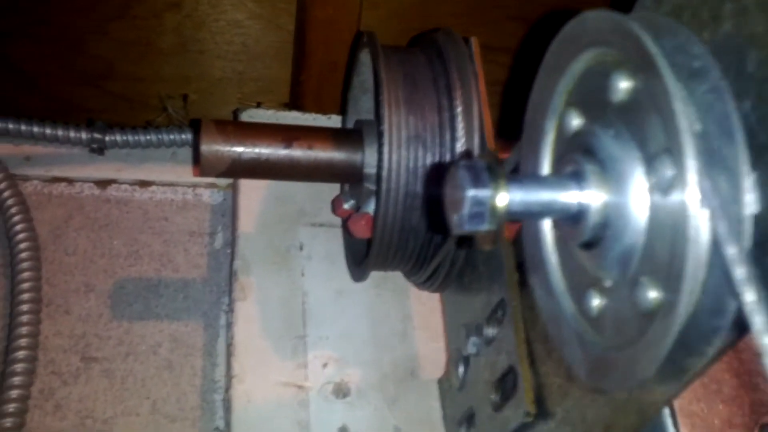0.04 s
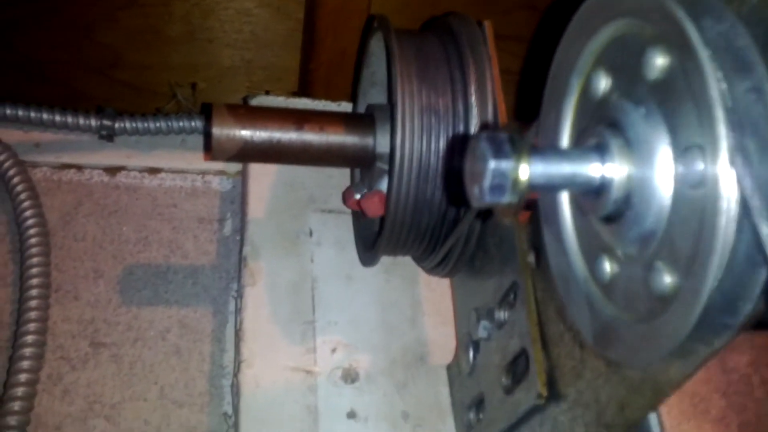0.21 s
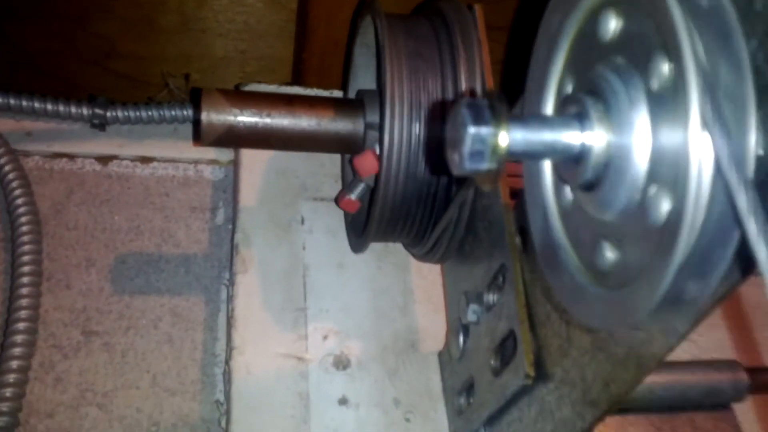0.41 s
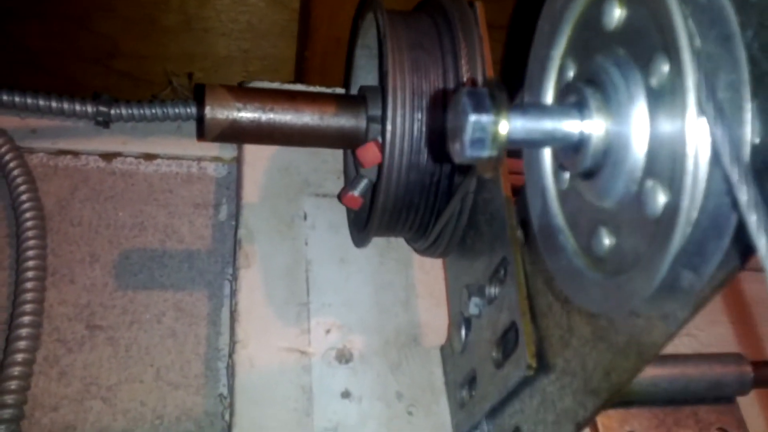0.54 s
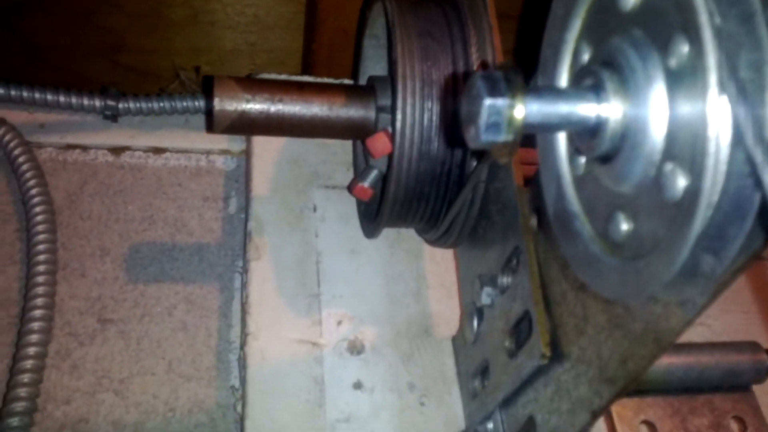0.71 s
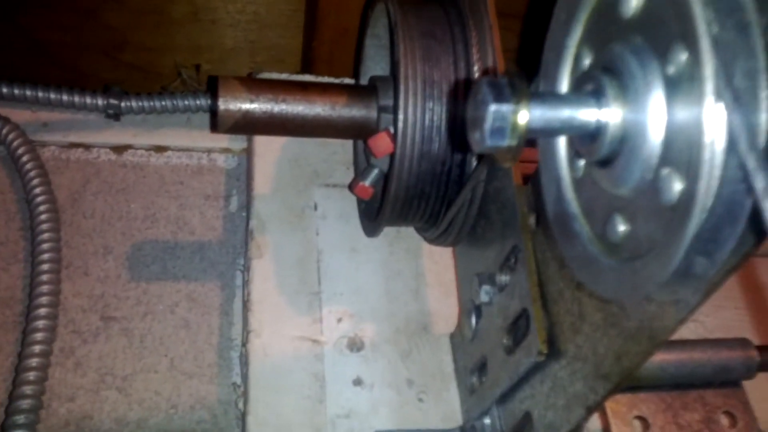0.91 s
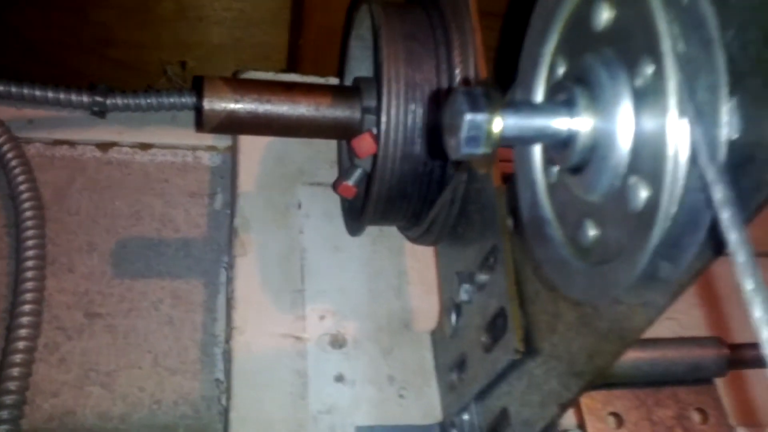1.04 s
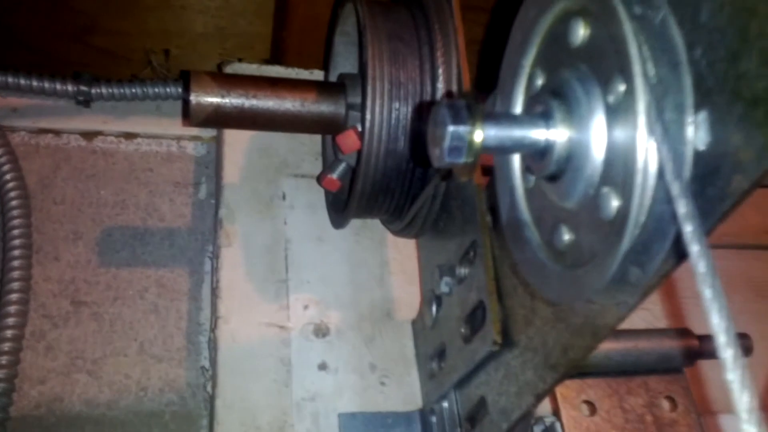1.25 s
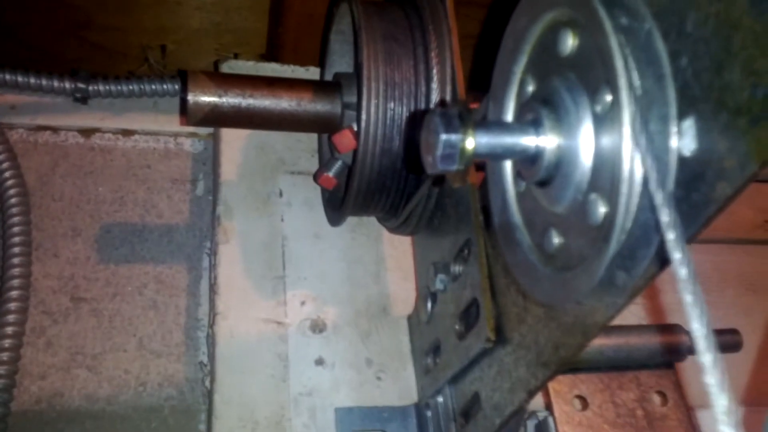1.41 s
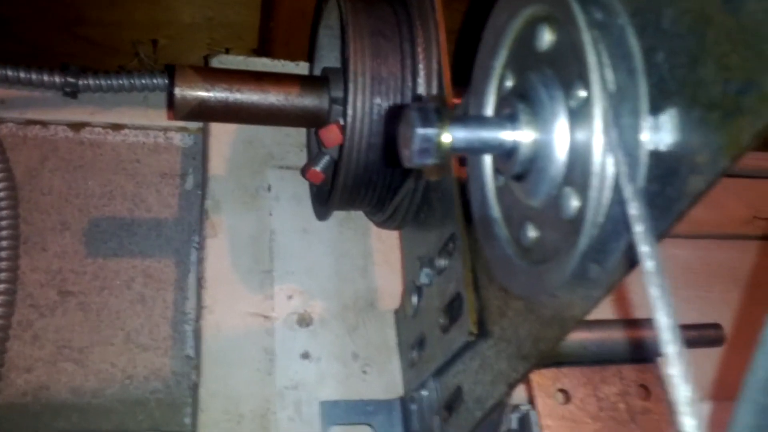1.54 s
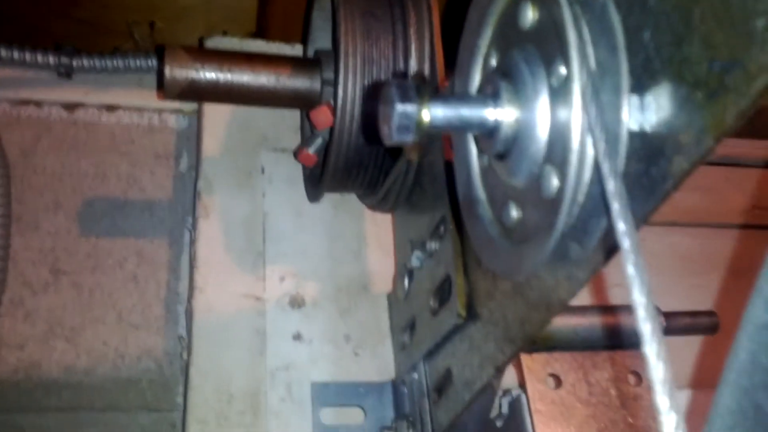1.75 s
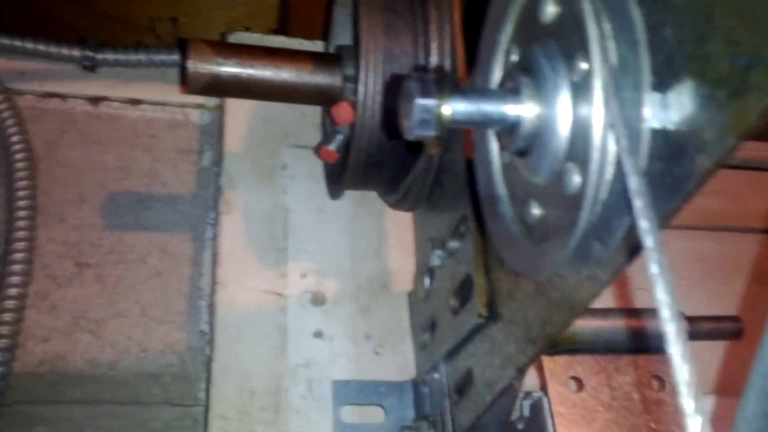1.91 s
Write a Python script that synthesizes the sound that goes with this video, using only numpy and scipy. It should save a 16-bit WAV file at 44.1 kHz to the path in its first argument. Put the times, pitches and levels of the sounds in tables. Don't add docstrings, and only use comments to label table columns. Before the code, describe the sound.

A steel garage door comes to rest: roller clatter fades from the start, with a dry tick at 0.14 s. A jolt and piercing pulley squeal hit at 0.25, the cable snaps at 0.44, and a bright, slightly clipped scraping slam follows at 0.51. Settling clacks at 0.65-0.68 ring away. Quiet garage air remains, with faint knocks near 1.15 and 1.49 and soft rubs around 1.22 and 1.52.

```python
import sys
import numpy as np
from scipy import signal
from scipy.io import wavfile
from scipy.ndimage import uniform_filter1d

SR = 44100
rng = np.random.default_rng(int(sys.argv[2]) if len(sys.argv) > 2 else 0)


def nominal_scale(level):
    x = np.asarray(level, float) / 20
    return 10 ** x


def dump_mix(stems):
    frames = np.atleast_2d(stems).T
    limited = np.clip(frames, -1, 1)
    pcm = np.round(limited * 32767).astype(np.int16)
    wavfile.write(sys.argv[1], SR, pcm)


N = 88200
T = np.arange(N) / SR

# f/Hz, density/dB
AIR_COLOUR = [(12, -37.5), (20, -7), (65, -6), (90, -14), (124, -10.5), (361, -26), (445, -31), (1780, -35),
              (3000, -45), (3900, -64), (6600, -120)]
# f/Hz, density/dB
HISS_COLOUR = [(2500, -10.5), (5000, -8.5), (8500, -9), (10000, -4.5), (11500, -1), (13000, -7.5),
               (15800, -14)]
AIR_DB, HISS_DB = -47.5, -57.5
# f/Hz, density/dB
ROLL_COLOUR = [(200, -12.5), (400, -26), (640, -0.5), (1400, -3), (2200, -16), (4000, -24.5), (5000, -17.5),
               (7500, -36.5)]
ROLL_DB, ROLL_DECAY_SCALE = -20, 1.9
ROLL_HISS_DB, ROLL_HISS_T60_S = -43.5, 1
# f/Hz, t60/s
RING_T60 = [(250, .9), (660, 0.59), (1740, 0.44), (4590, .36), (11000, .25), (15000, .12)]

# t/s, level/dB, rise/s, t60/s
THUDS = [
    (-.05, -27.5, .01, 1.5),
    (.255, -16.5, 0.0067, 1.8),
    (.45, -16.5, 0.018, 0.99),
    (.52, -16, .015, 1.1),
    (.65, -28, 0.017, 1.36),
]
# f/Hz, density/dB
THUD_COLOUR = [(12, -35.5), (20, 0), (108, -0.5), (214, -8), (255, -3.5), (304, -13.5), (425, -9),
               (500, -18), (650, -16), (1100, -120)]

# t/s, peak level/dB, ring t60/s, wash/dB, dullness/0-1
TICKS = [
    (0.1417, -8.5, 0.03, -14, 0.3),
    (0.44, -4.5, 0.03, -12.5, 0.3),
    (0.6498, -11, 0.03, -16.5, 0.3),
    (0.6727, -22.5, 0.03, -10.5, 0.3),
]
# f/Hz, density/dB
TICK_COLOUR = [(600, -21.5), (1200, -14), (2000, -21), (4500, -15.5), (6000, -4.5), (9000, -6.5),
               (11000, -1), (15800, -16.5)]
# t/s, level/dB, f/Hz, t60/s
TICK_RINGS = [(.1416, -32, 3500, .05), (.1425, -26, 6000, .02), (.4405, -23, 5200, .12),
              (.6728, -15, 3600, .018), (.6505, -24, 4500, .04), (.652, -18, 1400, .05),
              (.681, -17, 1400, .05), (.68, -25, 930, .3), (.68, -30, 600, .35), (.26, -24, 255, .2)]
ECHO_S, ECHO_DB, DULL_DB_PER_OCT = 0.0012, -4.5, -5
CRACK_DB, CRACK_HZ, CRACK_S = -3, 9000, 0.0002
LINGER_DB, LINGER_T60_S = -30, 0.58

# t/s, level/dB, rise/s, decay scale/1, brightness/0-1
BLOWS = [
    (0.241, -16, 0.0059, 1.45, 0.47),
    (.441, -14.5, .004, 1.2, 0.2),
    (.513, -10.5, 0.0023, 1.2, .01),
    (0.648, -18.5, 0.0028, .9, 0.48),
    (0.673, -21.5, 0.0024, .9, 0.1),
]
# f/Hz, density/dB
PANEL_COLOUR = [(150, -41), (250, -12), (469, -18), (606, -2.5), (793, -10), (935, -1.5), (1040, -6.5),
                (1260, -3.5), (9000, -40), (11700, -70.5), (19800, -120)]
BRIGHT_DB_PER_OCT = 6.0
SETTLE_S, SETTLE_DB_PER_S = 0.7, -26.5

# f/Hz, level/dB, t60/s
PULLEY_MODES = [(8030, -11, .25), (8320, -7, .3), (8393, 0, .42), (8463, -1, .42), (8540, -8, .3),
                (8890, -11, .2), (9023, -14, .25)]
# f/Hz, density/dB
SQUEAL_COLOUR = [(2500, -34), (5500, -33.5), (7500, -22), (8400, -6), (9200, -13), (10300, -16.5),
                 (12000, -30), (15800, -27)]
# f/Hz, t60/s
SQUEAL_T60 = [(3000, .35), (7300, .25), (8400, .42), (9500, .29), (11000, .3), (15000, .24)]
SQUEAL_S, SQUEAL_RISE_S, SQUEAL_DB, SQUEAL_WASH_DB = 0.2445, 0.008, -7, -1
SQUEAL_STOP_S, SQUEAL_STOP_DB_PER_S = 0.33, -200

# t/s, level/dB, rise/s, decay scale/1
SCRAPES = [
    (0.453, -15, .012, 1.2),
    (0.491, -10, .01, 1.33),
    (0.5112, 1, .004, 1.063),
]
# f/Hz, density/dB
SCRAPE_COLOUR = [(1500, -15.5), (3700, -18), (8000, -21), (9800, -15.5), (11000, -4.5), (12200, -14.5),
                 (13400, -17), (15800, -29.5)]
# f/Hz, t60/s
SCRAPE_T60 = [(2000, 0.33), (5000, .4), (8000, 0.25), (11000, 0.25), (13500, .25), (15500, .13)]
# f/Hz, level/dB, t60/s
TRACK_MODES = [(3500, -4, .4), (3700, 0, .45), (260, 2, .25)]
TRACK_DB = -23

# t/s, level/dB, f/Hz, t60/s
KNOCKS = [
    (1.128, -52, 620, .1),
    (1.172, -48, 570, .3),
    (1.4915, -34, 280, .035),
]
# middle t/s, rise/s, level/dB, fade/s, tilt/dB per octave
RUBS = [
    (1.223, 0.063, -39.5, .09, -1),
    (1.52, .03, -43.5, 0.18, 1.2),
]
# f/Hz, density/dB
RUB_COLOUR = [(180, -43), (300, -15), (485, -15), (563, -26), (710, -13.5), (1150, -18), (5640, -22),
              (11900, -13.5), (15800, -38.5)]


def read(points, hz):
    f, value = np.transpose(points)
    return np.interp(np.log(hz + 1), np.log(f + 1), value)


def decay(u_s, t60_s):
    return nominal_scale(np.maximum(-60 * u_s / t60_s, -200))


def onset(start_s, rise_s):
    return np.clip((T - start_s) / max(rise_s, 1e-4), 0, 1) ** 0.82


def settle():
    return nominal_scale(SETTLE_DB_PER_S * np.maximum(T - SETTLE_S, 0))


def ringing(colour, start_s=0.0, t60=((1, 1e6),), scale=1, tilt_db=0, size=256, patchy_db=0):
    hz, hop = np.fft.rfftfreq(size, 1 / SR), size // 4
    t = np.arange(N // hop + 5) * hop / SR - start_s
    a, b, patch = rng.standard_normal((len(t), len(hz), 3)).T
    patch = uniform_filter1d(patch, size=4, axis=0)
    patch = uniform_filter1d(patch, size=6, axis=1) * np.sqrt(24)
    shape = nominal_scale(read(colour, hz) + tilt_db * np.log2(hz / 4000 + 0.1))
    shape = shape * (hz < colour[-1][0] * 1.02)
    fall_db = -60 * np.maximum(t, 0) / (scale * read(t60, hz))[:, None]
    fall = nominal_scale(np.maximum(fall_db, -200) + patchy_db * patch)
    z = (a + 1j * b) * shape[:, None] * fall / np.sqrt(np.mean(shape ** 2))
    return signal.istft(z, nperseg=size, noverlap=size - hop)[1][:N] / np.sqrt(size * 4 / 3)


def modes(table, start_s, rise_s, blur=0.0, sharp=1.0):
    u, out = np.maximum(T - start_s, 0), 0
    for hz, db, t60_s in table:
        width = max(int(sharp * 160 / hz * SR / 16), 1)
        slow = uniform_filter1d(rng.standard_normal((2, N // 16 + 2)), width)
        a, b = uniform_filter1d(slow, width) * np.sqrt(width * 0.75)
        wander = np.interp(np.arange(N) / 16, np.arange(len(a)), a + 1j * b)
        sway = np.sqrt(1 - np.clip(blur, 0, 1) ** 2) + blur * wander
        tone = np.exp(2j * np.pi * (hz * u + rng.random()))
        out = out + nominal_scale(np.maximum(db - 60 * u / t60_s, -200)) * (sway * tone).real
    return onset(start_s, rise_s) * out


def air():
    low = nominal_scale(AIR_DB) * ringing(AIR_COLOUR, size=2048, patchy_db=2.75)
    return low + nominal_scale(HISS_DB) * ringing(HISS_COLOUR, patchy_db=1.9)


def roll():
    clatter = ringing(ROLL_COLOUR, 0, RING_T60, ROLL_DECAY_SCALE, size=512, patchy_db=2.5)
    hiss = ringing(HISS_COLOUR, 0, ((1, ROLL_HISS_T60_S),))
    return nominal_scale(ROLL_DB) * clatter + nominal_scale(ROLL_HISS_DB) * hiss


def thuds():
    out = np.zeros(N)
    for s, db, rise_s, t60_s in THUDS:
        band_t60 = ((60, t60_s * 1.21), (300, t60_s * 0.71))
        out += nominal_scale(db) * onset(s, rise_s) * ringing(THUD_COLOUR, s, band_t60, size=2048)
    return out


def ticks():
    out, linger = np.zeros(N), ringing(HISS_COLOUR)
    for s, db, t60_s, wash_db, dull in TICKS:
        u, echo_u = np.maximum(T - s, 0), np.maximum(T - s - ECHO_S, 0)
        echo = (echo_u > 0) * nominal_scale(np.maximum(ECHO_DB - 60 * echo_u / t60_s, -200))
        env = decay(u * 4.2, t60_s) + echo
        tilt_db = DULL_DB_PER_OCT * dull
        burst = env * ringing(TICK_COLOUR, tilt_db=tilt_db)
        wash = nominal_scale(wash_db) * ringing(TICK_COLOUR, s, RING_T60, 0.4, tilt_db)
        crack = nominal_scale(CRACK_DB) * np.exp(-u / CRACK_S) * np.sin(2 * np.pi * CRACK_HZ * (1 - dull) * u)
        tail = (u > 0) * nominal_scale(LINGER_DB - 60 * u / LINGER_T60_S) * linger
        out += nominal_scale(db) * (onset(s, 0.0003) * (burst + wash) + crack + tail)
    for s, db, hz, t60_s in TICK_RINGS:
        out += nominal_scale(db) * modes([(hz, 0, t60_s)], s, 0.001, blur=0.85, sharp=0.04)
    return out


def panels():
    clang = np.zeros(N)
    for s, db, rise_s, scale, bright in BLOWS:
        ring = ringing(PANEL_COLOUR, s, RING_T60, scale, BRIGHT_DB_PER_OCT * bright, size=512, patchy_db=1.0)
        clang += nominal_scale(db) * onset(s, rise_s) * ring
    return clang * settle()


def squeal():
    wash = ringing(SQUEAL_COLOUR, SQUEAL_S, SQUEAL_T60, size=512, patchy_db=4.1)
    wash = onset(SQUEAL_S, SQUEAL_RISE_S) * wash
    tones = modes(PULLEY_MODES, SQUEAL_S, SQUEAL_RISE_S, blur=0.34, sharp=0.58)
    stop = nominal_scale(SQUEAL_STOP_DB_PER_S * np.clip(T - SQUEAL_STOP_S, 0, 1))
    return nominal_scale(SQUEAL_DB) * tones * stop + nominal_scale(SQUEAL_WASH_DB) * wash


def scrapes():
    hiss = np.zeros(N)
    for s, db, rise_s, scale in SCRAPES:
        ring = ringing(SCRAPE_COLOUR, s + rise_s, SCRAPE_T60, scale, patchy_db=2.44)
        hiss += nominal_scale(db) * onset(s, rise_s) * ring
    track = modes(TRACK_MODES, SCRAPES[-1][0], 0.004, blur=0.6, sharp=0.3)
    return (hiss + nominal_scale(TRACK_DB) * track) * settle()


def knocks():
    out = np.zeros(N)
    for s, db, hz, t60_s in KNOCKS:
        pair = [(hz, 0, t60_s), (hz * 1.7, -6, t60_s * 0.6)]
        out += nominal_scale(db) * modes(pair, s, 0.002, blur=0.3, sharp=0.05)
    return out


def rubs():
    out = np.zeros(N)
    for mid_s, rise_s, db, fade_s, tilt_db in RUBS:
        rise = onset(mid_s - rise_s, rise_s)
        swell = rise * np.exp(-3 * (np.maximum(T - mid_s, 0) / fade_s) ** 1.2)
        tail = nominal_scale(-8.5) * rise * ringing(PANEL_COLOUR, mid_s + rise_s, RING_T60, 0.68, size=512)
        out += nominal_scale(db) * (swell * ringing(RUB_COLOUR, tilt_db=tilt_db, patchy_db=2.0) + tail)
    return out


def scene():
    door = roll() + thuds() + ticks() + panels() + squeal() + scrapes()
    return (air() + door + knocks() + rubs())[None]


def low_pass(x):
    return signal.sosfilt(signal.butter(12, 15910, fs=SR, output="sos"), x)


def record(dry):
    mix = np.clip(dry, -1, 1)
    return low_pass(mix)


dry = scene()
out = record(dry)
dump_mix(out)
```